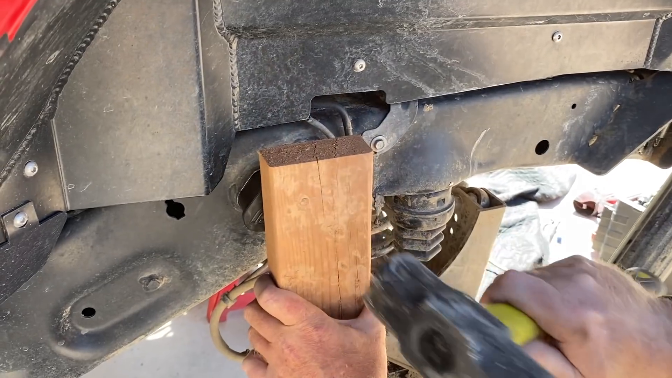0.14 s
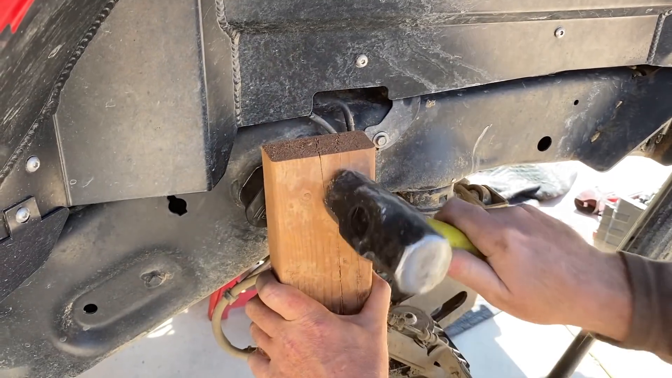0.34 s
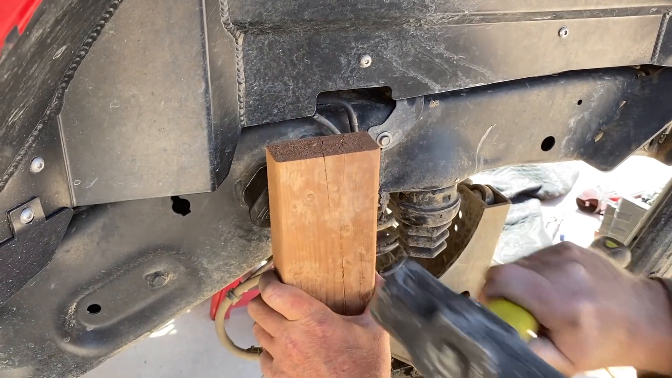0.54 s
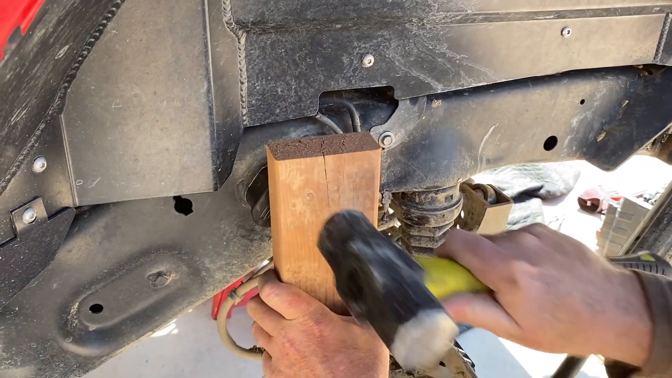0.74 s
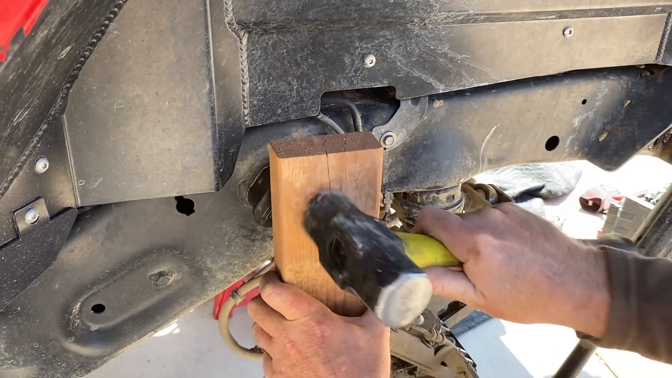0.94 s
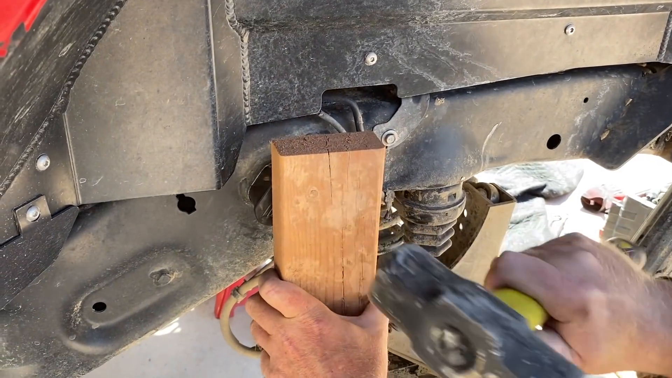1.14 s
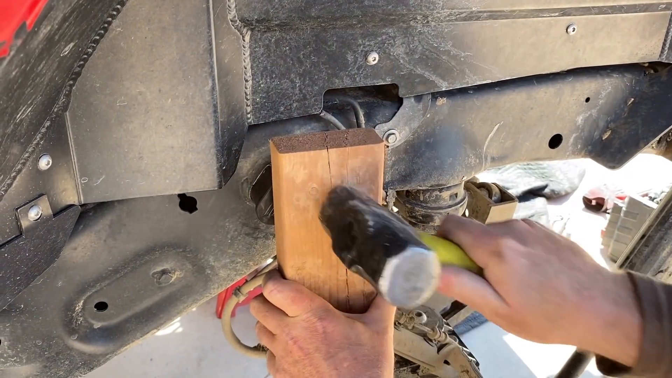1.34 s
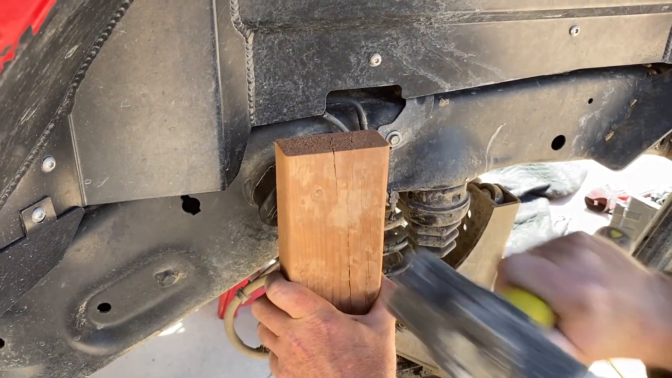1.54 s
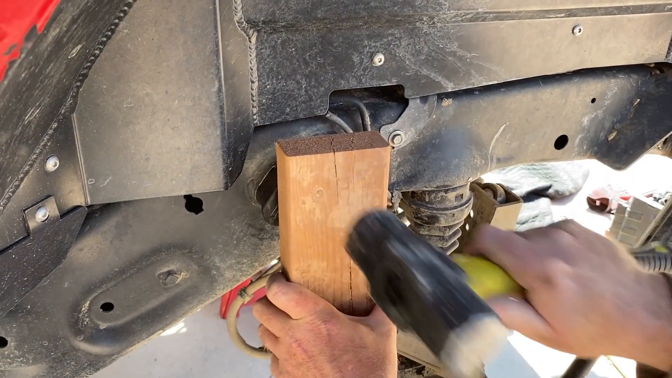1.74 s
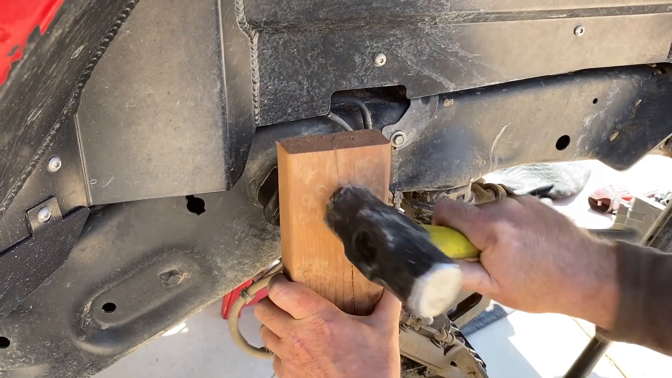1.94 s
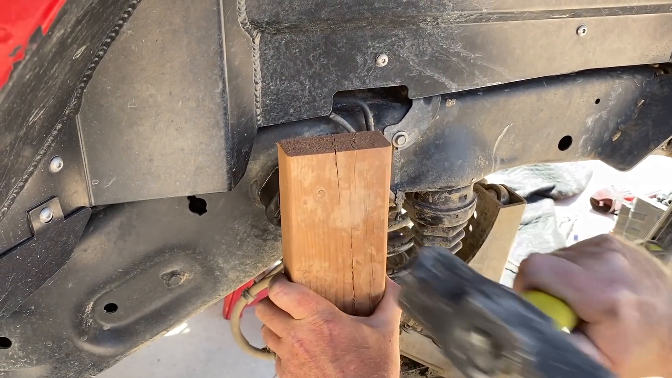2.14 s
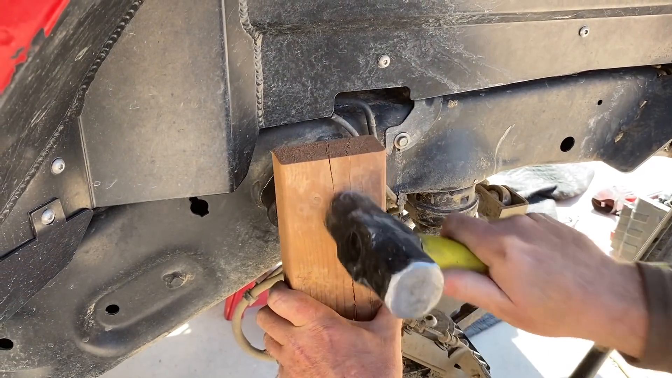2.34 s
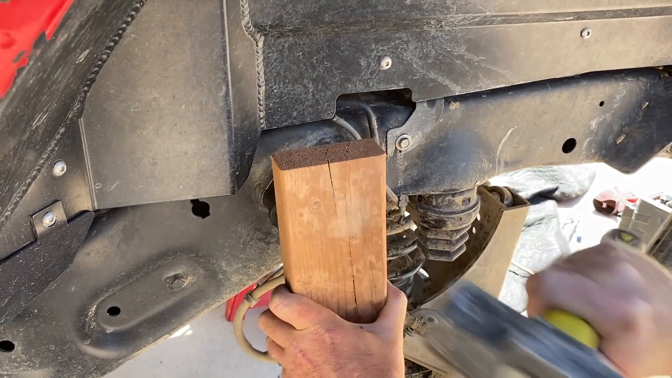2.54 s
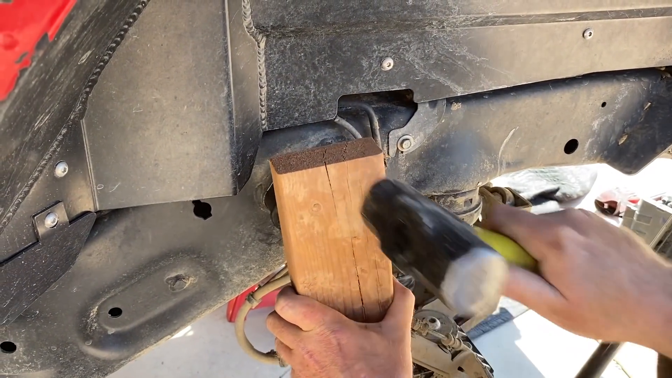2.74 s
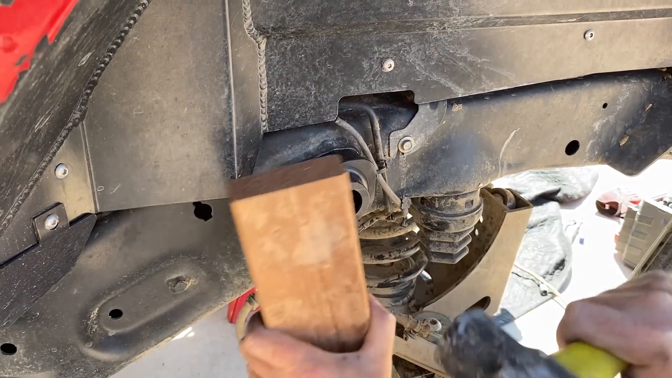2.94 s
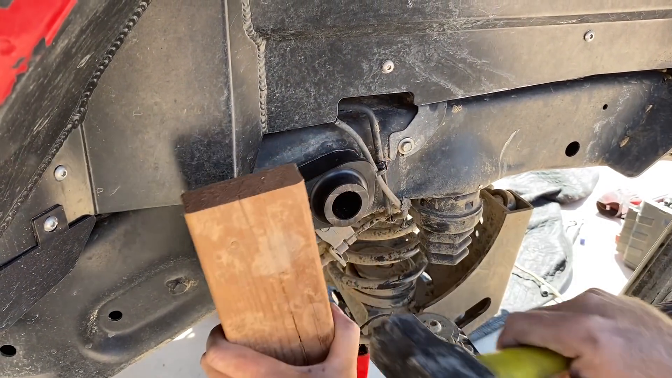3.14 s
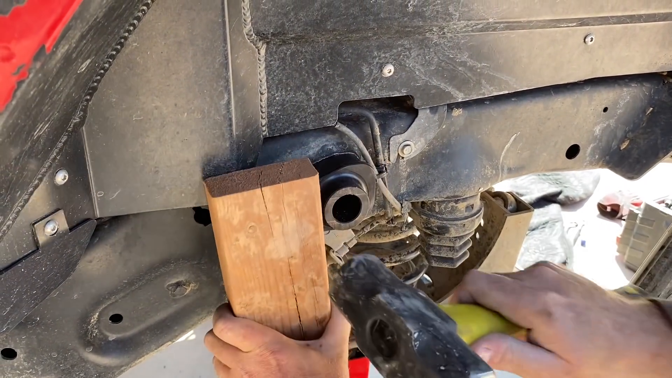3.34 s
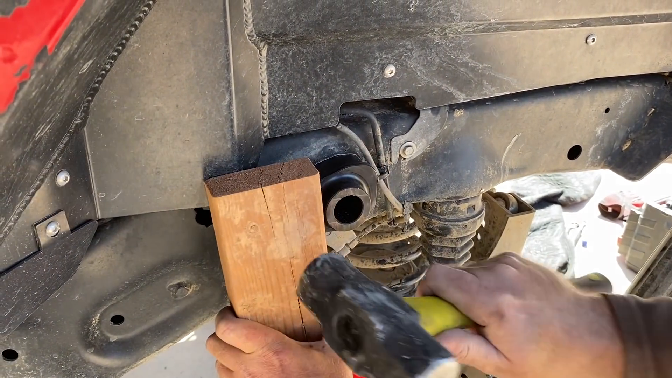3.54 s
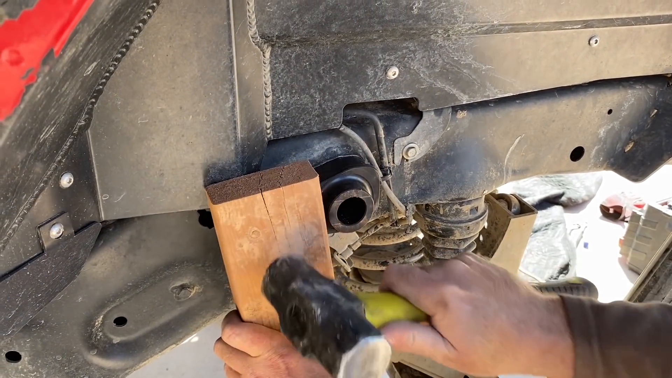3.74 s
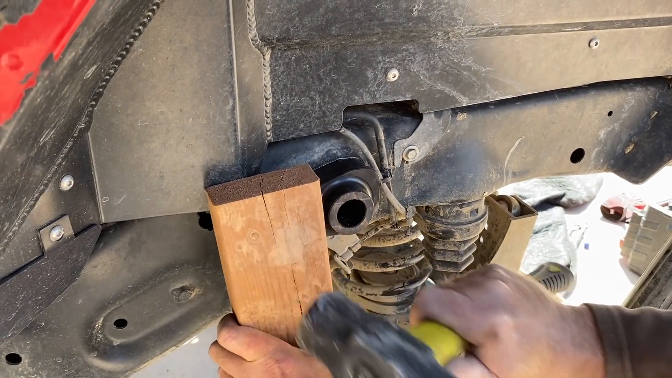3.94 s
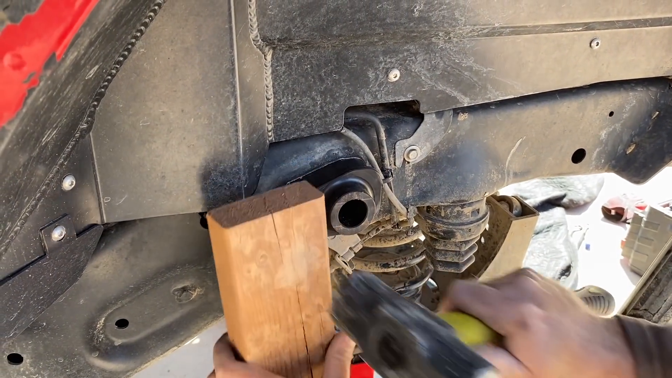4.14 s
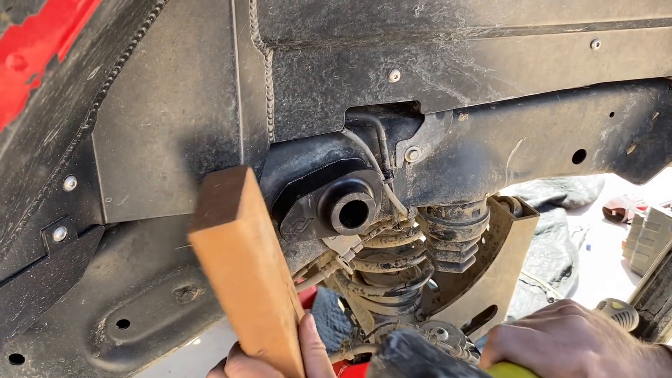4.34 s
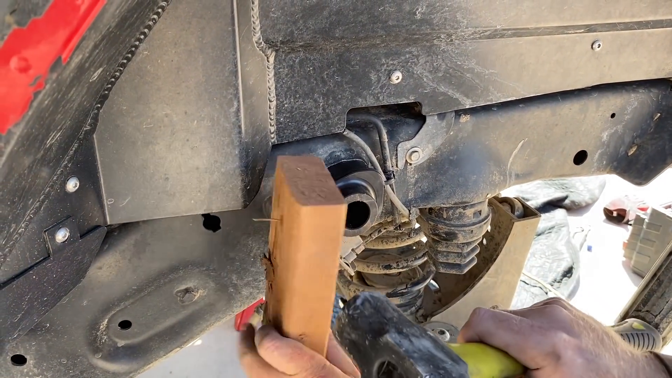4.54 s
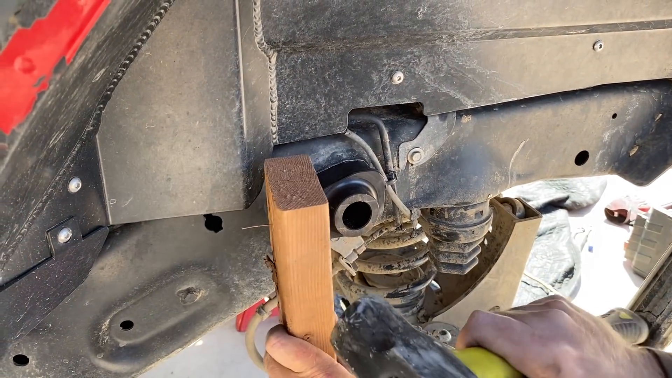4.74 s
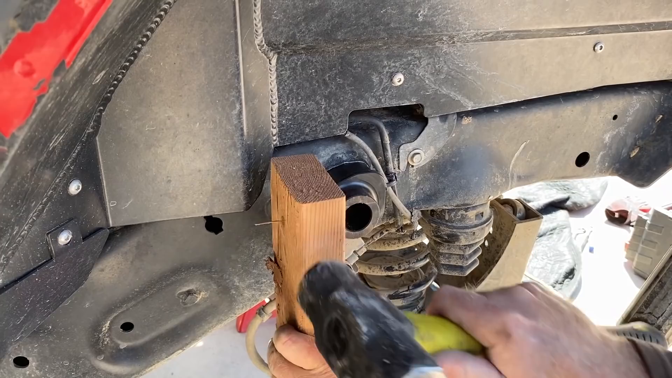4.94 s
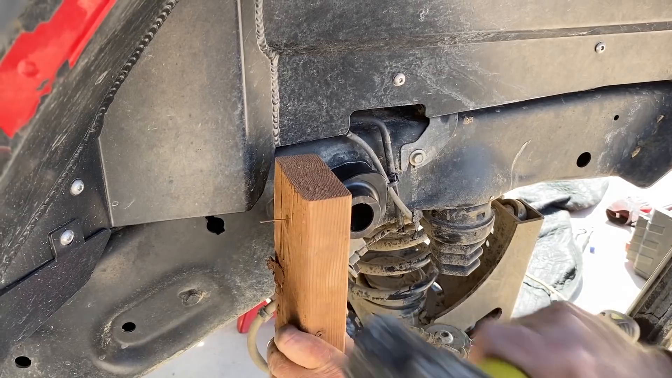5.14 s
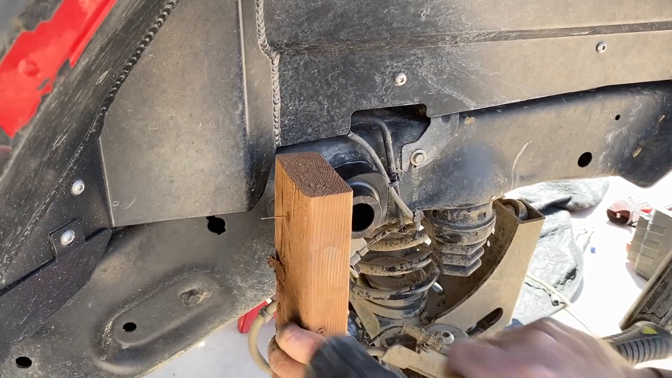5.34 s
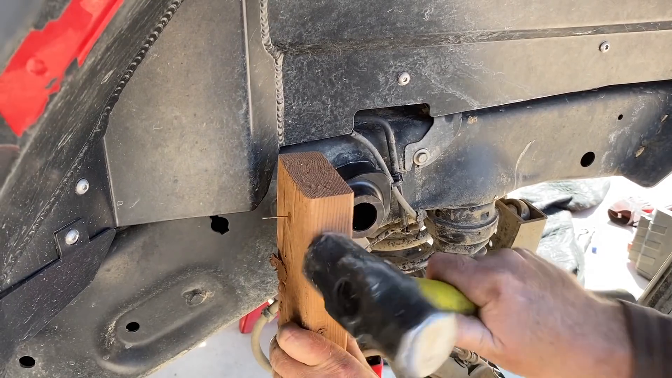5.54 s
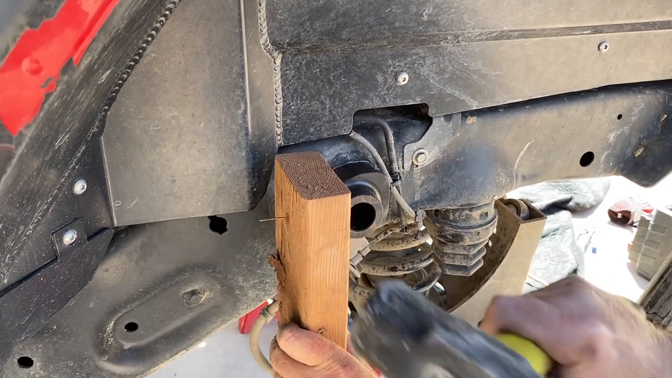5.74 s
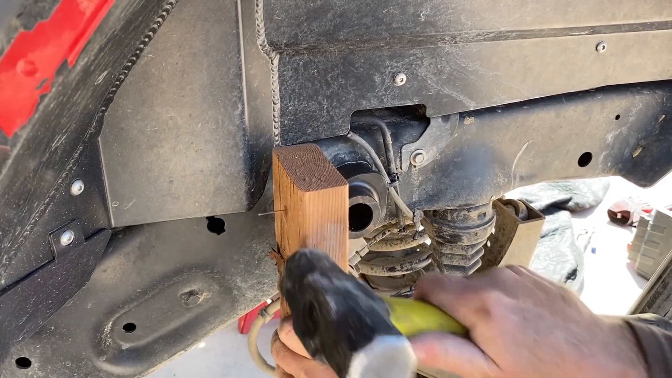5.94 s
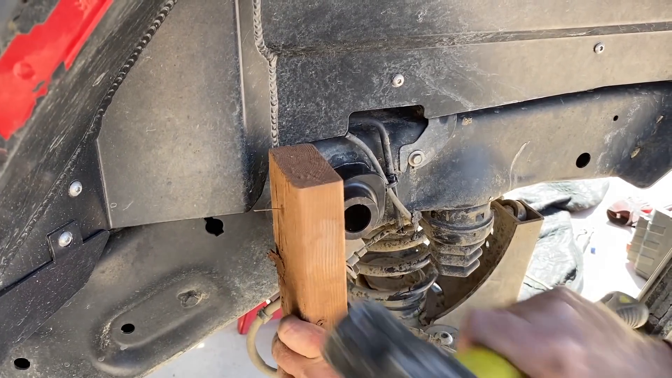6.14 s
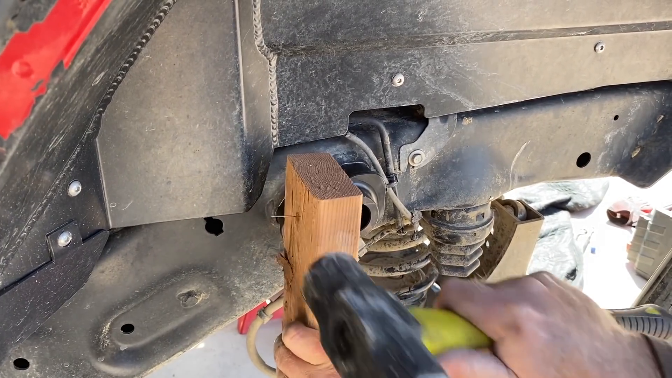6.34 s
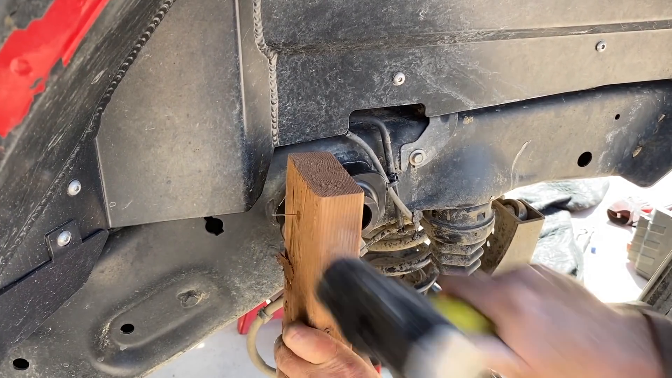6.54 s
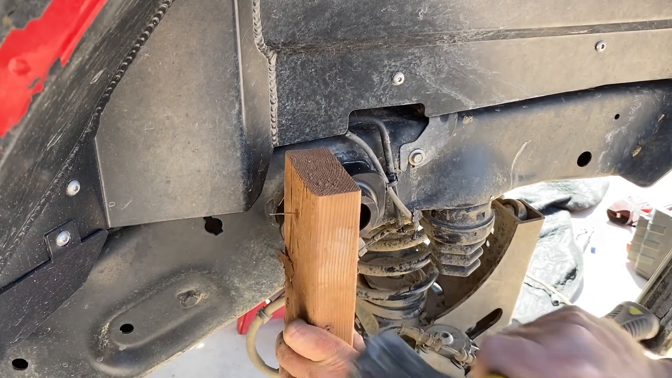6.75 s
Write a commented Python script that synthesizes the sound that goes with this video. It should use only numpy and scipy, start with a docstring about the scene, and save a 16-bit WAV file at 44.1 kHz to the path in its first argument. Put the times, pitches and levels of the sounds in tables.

```python
"""Hammering on a vehicle bushing

A sledge hammer drives a bushing into a vehicle frame through a hand-held wooden block, outdoors.
Blows land on the block's corner and flat, then off-centre; it is set down, and a run on its edge follows.
Each impact sums damped block modes and crack noise, then frame, spring, panel, rocking and rattle answers.
Filtered copies return from far walls; grainy scuffs, air and breeze are shaped noise.
The close microphone clips the hardest peaks.
"""
import sys
import numpy as np
from scipy import signal
from scipy.fft import rfft, irfft, next_fast_len
from scipy.io import wavfile
from scipy.ndimage import uniform_filter1d, map_coordinates

SR = 44100
rng = np.random.default_rng(int(sys.argv[2]) if len(sys.argv) > 2 else 0)


def generate_wav(signal):
    """Clip the signal to [-1, 1] and save it as 16-bit WAV at the path in sys.argv[1]."""
    frames = np.transpose(np.atleast_2d(signal))
    scaled = np.clip(frames, -1, 1) * 32767
    pcm = np.round(scaled).astype(np.int16)
    wavfile.write(sys.argv[1], SR, pcm)


N = 299439
T = np.arange(SR) / SR  # one second of local time/s

# Outdoor air spectrum: f/Hz, relative density/dB
AIR = [(20, -13), (45, -0.5), (100, -0.5), (200, 1), (320, -7), (500, -8.5), (800, -14.5), (1550, -17.5),
       (2300, -24), (4000, -29.5), (7000, -30.5), (15000, -37.5)]
# Breeze on the microphone, spectrum: f/Hz, relative density/dB
BREEZE_COLOUR = [(3, -7), (9, -2), (18, -15.5), (30, -25.5), (48, -33.5), (70, -42), (150, -60),
                 (400, -120)]
# Handling noise, a sleeve rustling (the long first row), then the block scuffing in the hand and on the frame:
# t/s, length/s, level before fades/dB, low-pass f/Hz
SCUFFS = [(2.952, 0.57, -65.5, 3180), (3.278, 0.019, -62, 6000), (3.328, 0.029, -55, 7000),
          (4.23, 0.097, -58, 13000), (4.417, 0.063, -51.5, 6500), (4.474, 0.084, -64.5, 5000),
          (4.597, 0.0051, -54.5, 6000), (4.58, 0.073, -66, 4000), (4.68, 0.026, -68, 8500)]
# Scuff spectrum before the low-pass: f/Hz, relative density/dB
SCUFF_COLOUR = [(300, 6), (1000, 3), (1550, -1), (2500, -7), (3200, -7), (3800, -2), (4700, -5.5),
                (6600, 0.5), (9000, 0.5), (13500, -11), (16000, -5)]
# Far walls: delay/s, level/dB, low-pass f/Hz
ECHOES = [(.0757, -35.5, 8000), (.2222, -48.5, 1900)]
# Body rocking on its mounts: f/Hz, level re impact/dB, t60/s
ROCK = (48, -29, .3)
# Wheel-well panels, spectrum: f/Hz, relative density/dB
PANELS = [(40, -18.5), (90, -9.5), (170, -10.5), (300, -5), (450, 3), (680, -2), (1100, 0.5), (1500, -2.5),
          (1800, -8), (2500, -10.5), (4000, -19), (7000, -28.5), (11000, -36), (16000, -45)]
# Panel decay: f/Hz, t60/s
PANEL_DECAY = [(60, 0.83), (200, 0.5), (450, 0.24), (1100, 0.22), (2500, .22), (6000, .18), (14000, 0.11)]
# Coil spring and loose steel, modes: f/Hz, relative level/dB, t60/s
SPRING = [(1090, -17, .5), (1240, -13, .36), (1281, -35, 1), (1351, -38, 1.1), (1588, -44, 1.6),
          (2256, -39.5, 1.0), (2627, -48, 2.2)]
# Frame damped by rubber mounts, modes: f/Hz, relative level/dB, t60/s
FRAME = [(89.5, -19, 0.77), (114.7, -18.5, 1.4), (154.9, -4.5, 0.46), (191.8, -10, 0.69), (224, -7, 0.53),
         (232.6, -21, 1), (248.4, -3, 0.3), (287, -9, 0.53), (318.6, -9.5, 0.75), (353, -14, 0.77),
         (386.5, -0.5, 0.27), (419, -3.5, .28), (440, -4.5, 0.23), (501, -1.5, 0.14), (542, -3, 0.2),
         (730, -3.5, 0.086), (844, -3.5, 0.24), (910, -2, 0.15), (1025, 1.5, 0.2), (1380, -6, .2),
         (1520, -5.5, 0.1), (2070, -11, 0.24)]
# Passage of an impact into the vehicle, per kind: f/Hz, gain/dB
COUPLING = {"corner": [(120, 0.5), (400, -0.5), (1200, 0), (2700, 6.5), (5000, -2), (10000, -1.5)],
            "flat": [(120, 0.5), (400, 2.5), (1200, 2), (3000, -1), (10000, -6)], "skewed": [(150, -4),
            (350, 2), (1200, -1), (2500, 1), (4000, -1.5), (7000, -16)], "tilted": [(120, -9), (350, -0.5),
            (1200, -0.5), (3000, 0.5), (10000, -8)], "tap": [(130, -0.5), (330, 4.5), (800, 2),
            (1600, -14.5), (3000, -13), (10000, -5.5)], "edge": [(120, 0), (400, 0.5), (1200, 2.5),
            (3000, 2), (10000, -1.5)]}
# Extra vehicle answer, kind of impact: gain/dB
SEATING_DB = {"corner": 2, "flat": 0, "skewed": 1, "tilted": 0, "tap": 1, "edge": 2}
# Crack at the contact (wood fibres crushed under the steel face), spectrum: f/Hz, relative density/dB
CRACK = [(100, -23), (500, -12.5), (1400, -2.5), (2200, -2.5), (3500, 3), (5000, -4.5), (7500, -11.5),
         (11000, -22.5), (16000, -30.5)]
# Block pressed on the bushing, modes per kind of impact: f/Hz, relative level/dB, t60/s
BLOCK = { "corner": [(473, -11, 0.027), (606, -12, 0.031), (872, -3, 0.029), (1136, 0, 0.035),
         (1226, 1.5, 0.027), (1535, -6, 0.045), (1851, -8, 0.048), (2146, -9.5, 0.033), (2530, -5, .045),
         (2919, -7, .035)], "flat": [(300, -27, 0.038), (448, -15, .045), (580, -18, 0.05),
         (796, -12.5, 0.06), (911, -8.5, 0.062), (1116.5, -5, 0.031), (1189, 7.5, 0.022),
         (1368, -10, 0.044), (1517, -10.5, .04), (1833, -17.5, 0.056), (2154, -17, 0.033),
         (2559, -19.5, 0.055), (3270, -11.5, 0.016), (3890, -18, 0.034), (5420, -21.5, 0.028),
         (6300, -26, 0.037)], "tilted": [(329.3, -14, 0.13), (402, -5, 0.074), (613, -13, 0.054),
         (900, 0.5, 0.037), (1040, 3.5, 0.018), (1230, -5, 0.038), (1460, -8, 0.021), (2020, -12, 0.027),
         (2570, -8, 0.01), (6600, -15.5, 0.038)], "tap": [(306, -9, 0.13), (380, 1.5, 0.054),
         (583, -4, 0.057), (720, -6.5, .06), (906, -13, 0.076), (1244, -13.5, 0.03), (2650, -32, 0.068)],
         "edge": [(429, -15, 0.14), (621.3, -9, 0.071), (876, -1.5, .035), (1047, -6.5, 0.09),
         (1160, 2, .032), (1298, 3.5, 0.031), (1731, -9.5, .028), (2080, -21, 0.045), (2880, -8, 0.016),
         (3573, 2.5, 0.018), (4573, -4, .018), (5940, -11, .018), (7520, -8, 0.0073)]}
BLOCK["skewed"] = BLOCK["flat"]  # same face struck, block off-centre on the bushing
# Hammer blows, and the block set down on the bushing at 4.405 and 4.43 s:
# t/s, kind, strength/dB, crack level re wood/dB
IMPACTS = [(-.025, "corner", -12.5, -7.5), (0.3301, "corner", -7.5, -7), (0.6711, "flat", -5, -12),
           (0.9941, "flat", -5, -9), (1.305, "flat", -4, -13), (1.6573, "flat", -3, -11),
           (1.9958, "flat", -3, -10), (2.3273, "flat", -3.5, -12.5), (2.676, "flat", -5, -12.5),
           (3.3339, "tap", -26, -30.5), (3.7326, "skewed", -10.5, -13.5), (4.0997, "tilted", -12.5, -15),
           (4.405, "tap", -31.5, -21.5), (4.43, "tap", -37, -21), (4.9246, "edge", -13.5, -6.5),
           (5.274, "edge", -9.5, -7), (5.6026, "edge", -7.5, -2), (5.924, "edge", -10, -7),
           (6.279, "edge", -8.5, -7.5), (6.629, "edge", -9, -4)]

AIR_DB, BREEZE_DB, GUST_DB, GUST_RATE_HZ = -65.0, -45.0, 4.5, 4
# *_DB with a *_DB_PER_DB: level under a 0 dB impact, and growth with strength
WAFT_DB, WAFT_DB_PER_DB, WAFT_S, WAFT_LEAD_S = -32.0, 0.62, 0.6, 0.25
SCUFF_GRAIN_DB, CRACK_GRAIN_DB = 1, 5.0
RATTLE_DB, RATTLE_DB_PER_DB, RATTLE_COUNT = -24, 1.5, 6
RATTLE_SPAN_S, RATTLE_FALL_DB_PER_S, TICK_T60_S = 0.11, 190.5, 0.028
VEHICLE_DB, VEHICLE_DB_PER_DB = -13.5, 0.89
PANEL_DB, STEEL_DB = 1.5, -11.5  # balance within the vehicle answer; steel = frame + spring
SPREAD_S = 0.022  # bending waves spreading through the steel
LEVEL_SAMPLES = 400  # stretch that sets the level of wood and crack
TOP_HZ = 15950


def amp(db):
    """Decibels to gain."""
    return 10 ** (np.asarray(db) / 20)


def unit(x, size=None):
    """Scale to rms 1 over the first size samples."""
    return x / np.sqrt(np.mean(x[:size] ** 2) + 1e-20)


def along(points, hz):
    """Interpolate (f/Hz, value) points on a log frequency axis."""
    f, v = np.transpose(points)
    return np.interp(np.log(hz + 1), np.log(f), v)


def filtered(x, response):
    """Multiply the spectrum of x by a response of frequency."""
    m = next_fast_len(len(x) + 8192)
    hz = np.fft.rfftfreq(m, 1 / SR)
    return irfft(rfft(x, m) * response(hz), m)[:len(x)]


def noise(colour, size):
    """Noise of rms 1 with the given spectrum."""
    white = rng.standard_normal(size)
    return unit(filtered(white, lambda hz: amp(along(colour, hz))))


def add(track, s, x):
    """Mix x into the track from time s on."""
    i = round(s * SR)
    x = x[max(-i, 0):max(N - i, 0)]
    track[max(i, 0):][:len(x)] += x


def swell(t, rise):
    """Smooth build-up from 0 to 1."""
    return 1 - np.exp(-(t / rise) ** 2)


def decay(t, t60):
    """Exponential fall of 60 dB per t60."""
    return amp(-60 * t / t60)


def grain(length, depth_db):
    """Gain fluttering over a millisecond or two, as fibres catch and give."""
    flutter = unit(uniform_filter1d(rng.standard_normal(length), size=70))
    return unit(amp(depth_db * flutter))


def ring(modes, t, scatter_db, detune, loose):
    """Damped modes with strengths, pitches and phases scattered anew at each call."""
    hz, db, t60 = np.transpose(modes)[:, :, None]
    level, pitch, lag = rng.standard_normal((3, len(modes), 1))
    cycles = hz * (1 + detune * pitch) * t + loose * lag
    envelope = amp(db + scatter_db * level) * decay(t, t60)
    return np.sum(envelope * np.sin(2 * np.pi * cycles), axis=0)


def outdoors():
    """Steady air noise; breeze and the waft around each impact add as power and heave with the gusts."""
    power = np.full(N, amp(BREEZE_DB) ** 2)
    waft_shape = np.hanning(int(WAFT_S * SR)) ** 2
    for s, _, strength_db, _ in IMPACTS:
        waft = amp(WAFT_DB + WAFT_DB_PER_DB * strength_db) ** 2 * waft_shape
        add(power, s - WAFT_LEAD_S, waft)
    gusts = map_coordinates(rng.standard_normal(32), [np.arange(N) * GUST_RATE_HZ / SR])
    breeze = np.sqrt(power) * amp(GUST_DB * gusts) * noise(BREEZE_COLOUR, N)
    return amp(AIR_DB) * noise(AIR, N) + breeze


def scuffs():
    """Handling noise: a sleeve rustle and short rubs of the handled block, grainy low-passed noise, faded in
    and out."""
    out = np.zeros(N)
    for s, length_s, db, bright_hz in SCUFFS:
        size = max(int(length_s * SR), 64)
        rub = noise(SCUFF_COLOUR, size) * grain(size, SCUFF_GRAIN_DB)
        dulled = filtered(rub, lambda hz: 1 / np.hypot(1, (hz / bright_hz) ** 2))
        add(out, s, amp(db) * np.hanning(size) * unit(dulled))
    return out


def echoes(impacts):
    """Far walls return the impacts late, thin, dull and smeared by decaying noise."""
    out, t = np.zeros(N), T[:SR // 10]
    for delay_s, db, dull_hz in ECHOES:
        envelope = decay(t, 0.005) + amp(-21) * decay(t, 0.1)
        smear = rng.standard_normal(len(t)) * envelope
        back = signal.fftconvolve(impacts, smear / np.linalg.norm(smear))[:N]

        def wall(hz):
            """High-pass at 2 kHz, low-pass at dull_hz."""
            return hz / np.hypot(hz, 2000) / np.hypot(1, (hz / dull_hz) ** 2)

        add(out, delay_s, amp(db) * filtered(back, wall))
    return out


def rattle():
    """Loose fittings: decaying noise ticks at random times, on average weaker the later they come."""
    out, t = np.zeros(N), T[:SR // 25]
    delays_s = RATTLE_SPAN_S * rng.uniform(0.24, 1, RATTLE_COUNT)
    for delay_s, scatter in zip(delays_s, rng.standard_normal(RATTLE_COUNT)):
        tick = noise(CRACK, len(t)) * decay(t, TICK_T60_S)
        tick_db = RATTLE_DB + 2 * scatter - RATTLE_FALL_DB_PER_S * delay_s
        add(out, delay_s, amp(tick_db) * tick)
    return out[:SR]


def panels():
    """Dense panel modes as noise with frequency-dependent decay, treble dying first."""
    hz, t, bins = signal.stft(noise(PANELS, SR), SR, nperseg=256)
    t60 = along(PANEL_DECAY, hz)[:, None]
    tail = signal.istft(bins * decay(t, t60), SR, nperseg=256)[1][:SR]
    return tail * swell(T, rise=0.0071)


def vehicle(kind, spread):
    """Panels, frame and spring shaken through the bushing, coloured by the kind of impact."""
    frame = ring(FRAME, T, scatter_db=3.5, detune=0.00087, loose=1)
    spring = ring(SPRING, T, scatter_db=2.5, detune=0.001, loose=1)
    body = amp(PANEL_DB) * panels() + amp(STEEL_DB) * (frame + spring) * spread
    return filtered(body, lambda hz: amp(along(COUPLING[kind], hz)))


def knock(kind, crack_db):
    """Block modes ring up while the block is pressed; the contact itself cracks."""
    t = T[:SR // 6]
    modes = ring(BLOCK[kind], t, scatter_db=2.0, detune=0.0064, loose=0.17)
    wood = unit(modes * swell(t, rise=0.0021), LEVEL_SAMPLES)
    contact = swell(t, rise=0.0014) * decay(np.maximum(t - 0.0028, 0), 0.015)
    # close walls of the wheel well prolong the crack
    walls = amp(-9) * swell(t, rise=0.005) * decay(t, 0.085)
    crack = noise(CRACK, len(t)) * grain(len(t), CRACK_GRAIN_DB) * (contact + walls)
    return wood + amp(crack_db) * unit(crack, LEVEL_SAMPLES)


def hammering():
    """Each blow or set-down knocks the block and shakes vehicle, mounts and fittings by its strength."""
    out, spread = np.zeros(N), swell(T, rise=SPREAD_S)
    for s, kind, strength_db, crack_db in IMPACTS:
        shake_db = VEHICLE_DB + VEHICLE_DB_PER_DB * strength_db + SEATING_DB[kind]
        rock = ring([ROCK], T, scatter_db=2, detune=0.03, loose=0.98) * spread
        add(out, s, amp(strength_db) * knock(kind, crack_db))
        add(out, s, amp(shake_db) * vehicle(kind, spread))
        add(out, s, amp(strength_db) * rock)
        add(out, s, amp(RATTLE_DB_PER_DB * strength_db) * rattle())
    return out


def scene():
    """Sum of background, handling, echoes and impacts."""
    impacts = hammering()
    return (outdoors() + scuffs() + echoes(impacts) + impacts)[None]


def record(dry):
    """Clip the hardest peaks flat, then end the band with a steep low-pass."""
    clipped = np.clip(dry[0], -1, 1)
    return filtered(clipped, lambda hz: 1 / np.hypot(1, (hz / TOP_HZ) ** 60))[None]


dry = scene()
out = record(dry)
generate_wav(out)
```